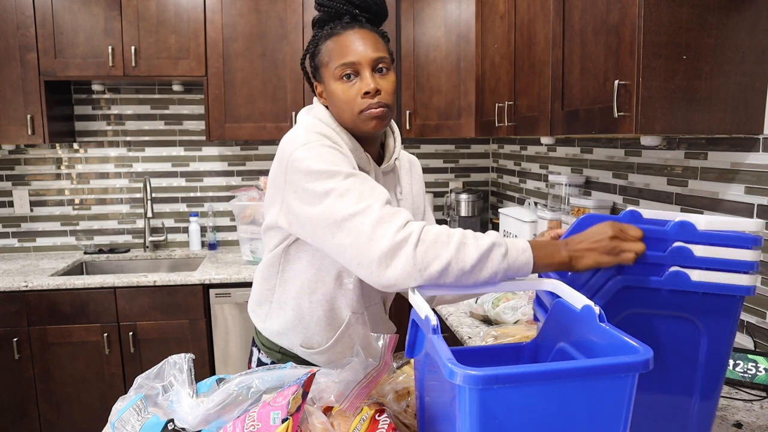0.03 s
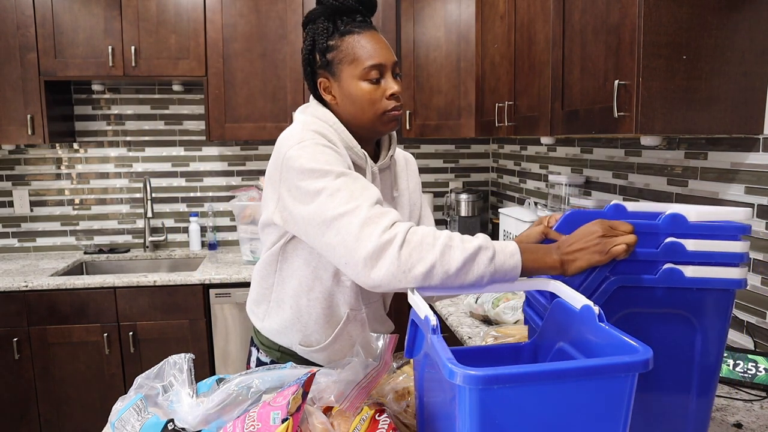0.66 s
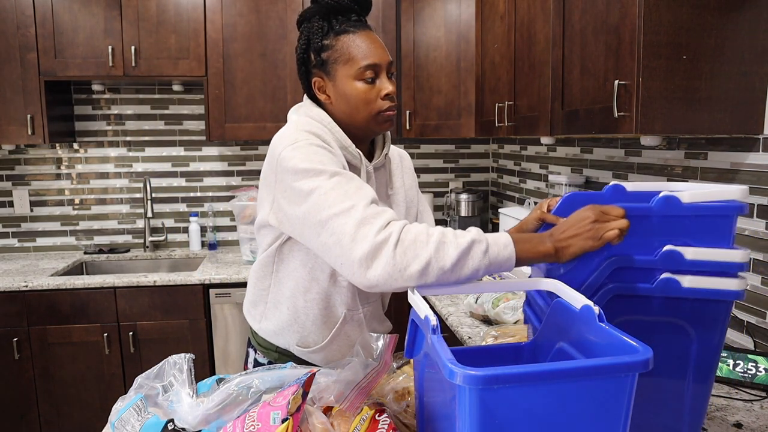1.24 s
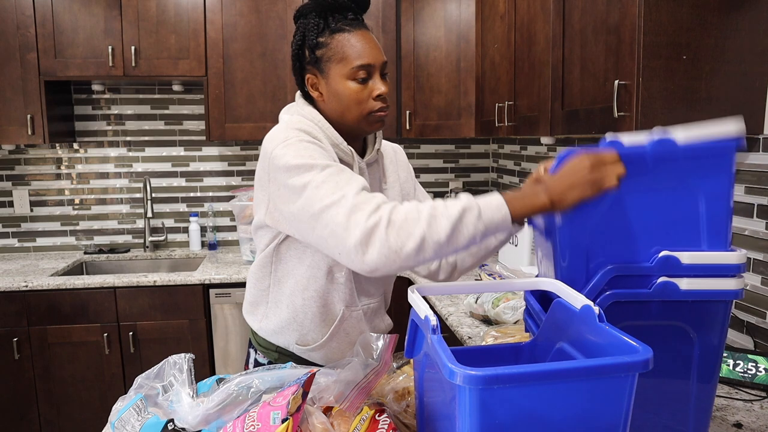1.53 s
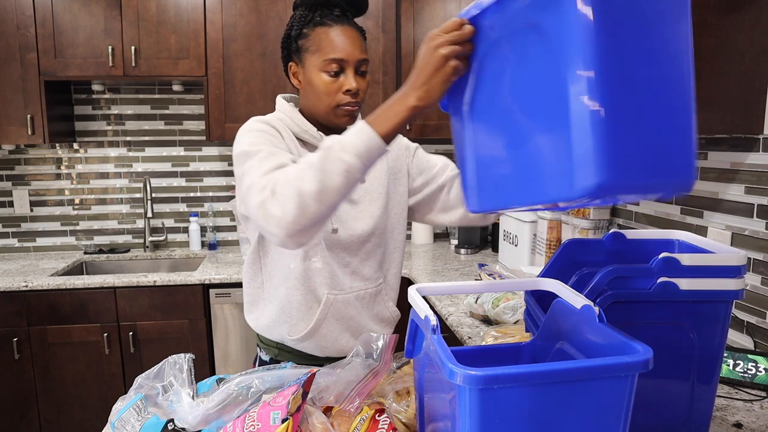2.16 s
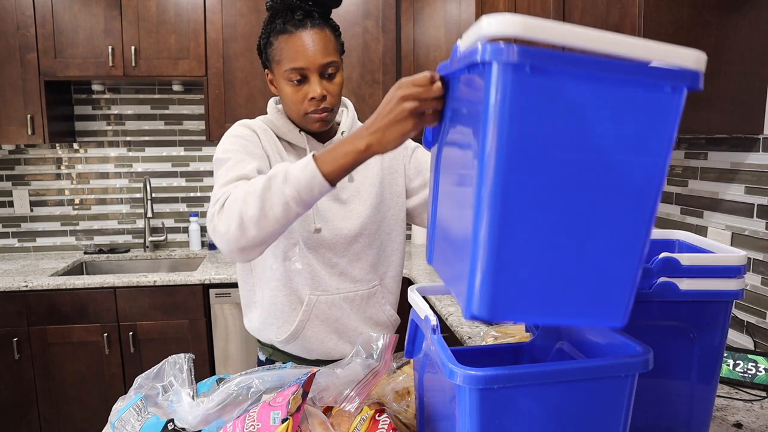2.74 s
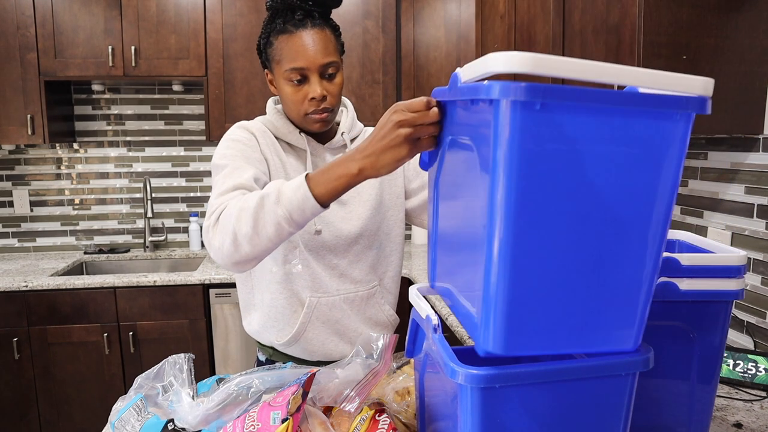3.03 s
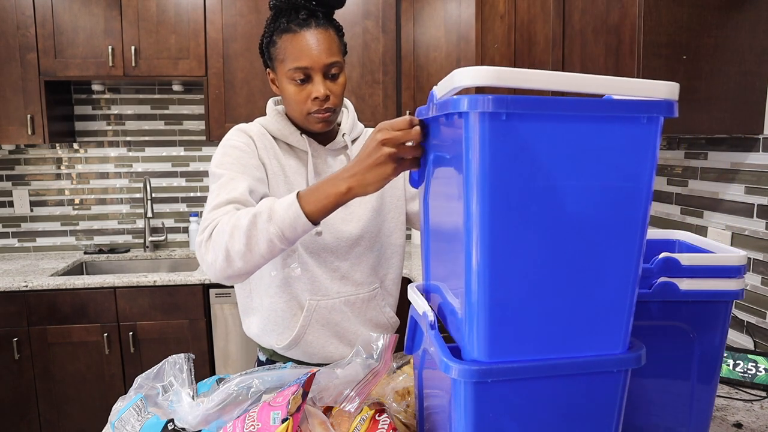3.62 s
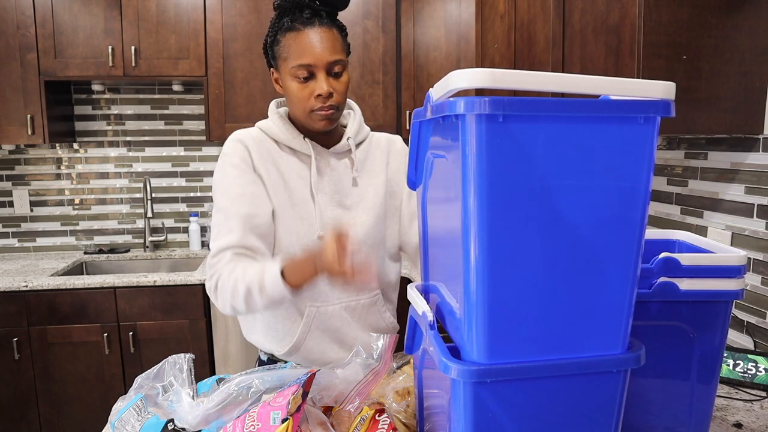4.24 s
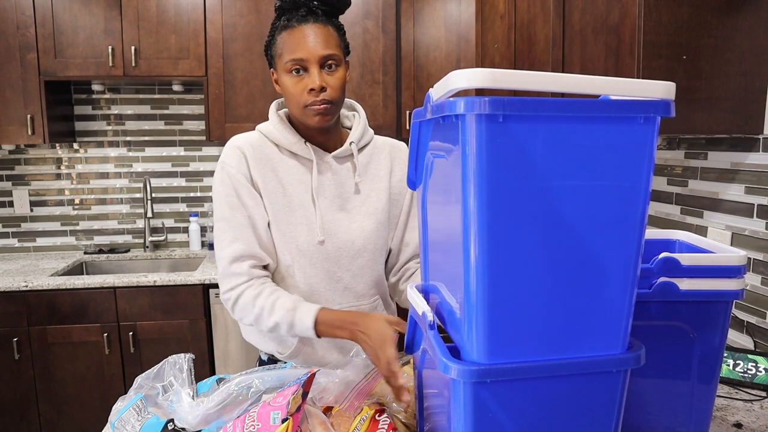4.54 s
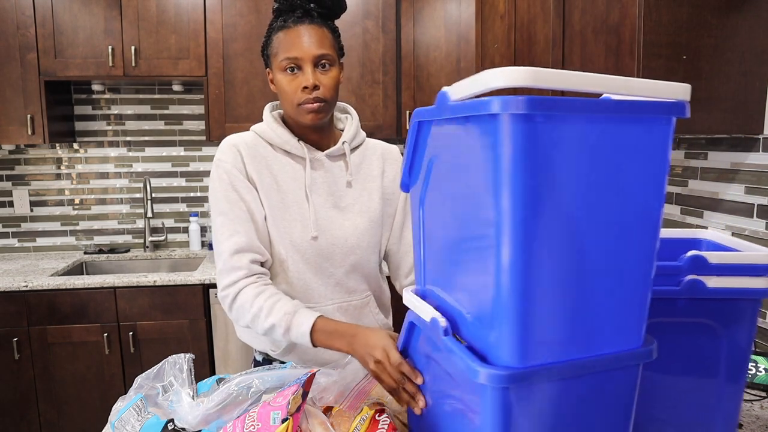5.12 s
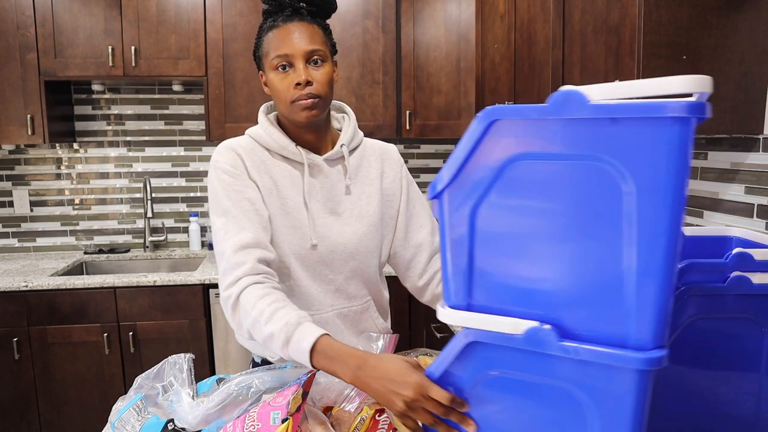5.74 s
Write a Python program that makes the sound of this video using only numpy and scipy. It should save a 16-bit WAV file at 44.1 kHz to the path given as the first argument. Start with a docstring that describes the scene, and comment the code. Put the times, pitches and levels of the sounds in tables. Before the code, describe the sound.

Hands rub and tap lightly on hollow plastic. A bin is tugged out of a nested pile with a loud, juddering clatter and a few more knocks. After a short pause it is set on another bin with a deep thump. Palms shift softly, then the stack scrapes over a gritty counter. The sounds are close, in a slightly echoing kitchen with a low appliance hum.

```python
"""Hands rub and tap on hollow plastic while an appliance hums underneath.
A bin is tugged out of a nested pile: its walls clatter, boom and judder as they stick and slip.
It is set on top of another bin, palms shift on it, and the stack scrapes over a kitchen counter.
Each knock is a sharp clack plus a deeper ring of the walls; each rub is many tiny slips over a hiss.
Cabinets and tiles throw the sounds back."""
import sys
import numpy as np
from scipy import signal
from scipy.fft import rfft, irfft
from scipy.io import wavfile

SR = 44100
rng = np.random.default_rng(int(sys.argv[2]) if len(sys.argv) > 2 else 0)


def digitize_waveform(pressure):
    """Quantize a signal to 16-bit integers and store it at the path in sys.argv[1].

    Rows of a 2-D input are taken as channels; values are limited to [-1, 1].
    """
    field = np.atleast_2d(pressure).T
    bounded = np.clip(field, -1, 1)
    quanta = np.round(bounded * 32767).astype(np.int16)
    wavfile.write(sys.argv[1], SR, quanta)


N = 259175
HZ = np.fft.rfftfreq(N, 1 / SR)
TIME = np.arange(N) / SR
GRIP_S, RELEASE_S = 0.00067, 0.063  # how fast a stroke takes hold and dies away

# Levels are relative, before mixing. A fade_s is the time a sound takes to fall by 60 dB.
# The steady tones of the appliance: pitch_hz, level_db
HUM_TONES = [(54.9, -48.5), (93.4, -44), (110, -55), (120, -58.5), (187, -79), (225, -56.5), (257, -56.5)]
# The tone colour (how strong the lows and highs are) of moving air: frequency_hz, level_db
AIR_COLOUR = [(15, -42), (30, -3.5), (45, -10.5), (72, -3), (100, -11.5), (135, -14), (240, -13),
              (420, -20), (1080, -28.5), (2550, -35), (5100, -44.5), (11200, -52), (12400, -67),
              (15000, -95)]
# Hands and walls rubbing on plastic: start_s, length_s, level_db, swell_db, treble_db
RUB_STROKES = [(0.0, 0.15, -46, -1, -10), (0.39, 0.052, -47.5, 4, -12.5), (0.745, 0.11, -52, 5, -8),
               (0.893, 0.019, -68.5, -24, 5), (1.03, 0.15, -55.5, -3, -17), (1.172, 0.14, -41.5, 13, -6.5),
               (3.42, 0.24, -55, -5.5, -14.5), (4.68, 0.046, -55, 1, -14), (4.85, 0.045, -58.5, -5, -7)]
# The tone colour of that rubbing: frequency_hz, level_db
RUBBING_COLOUR = [(40, -49), (150, 12.5), (300, 9.5), (580, 9.5), (1300, 6.5), (2200, 3.5), (4200, -3),
                  (5500, -7), (8000, -10.5), (10800, -10.5), (12200, -29), (15000, -49)]
# One knock a row. The clack is weaker above edge_hz; a firm grip leaves a small share of the ring time.
# start_s, clack_db, bright_db_per_octave, edge_hz, boom_db, boom_centre_hz, ring_share
KNOCK_EVENTS = [(0.098, -40, 10.5, 5700, -39, 1550, 0.41), (0.103, -40, 12, 5700, -44, 1300, 0.5),
                (0.428, -48.5, 10.5, 3800, -45.5, 1630, 0.71), (0.744, -46, 8.5, 12000, -55, 320, 0.89),
                (1.175, -50, 4, 12000, -60, 2030, 0.89), (1.263, -36.5, 4, 11000, -34, 247, 1),
                (1.319, -22, 2.5, 5400, -22.5, 517, 0.48), (1.337, -30, 11.5, 9000, -29, 114, 0.68),
                (1.342, -21, 0.5, 11000, -35, 564, .8), (1.351, -26, 3, 5000, -25, 168, 0.96),
                (1.400, -20.5, 4, 12000, -27, 198, 0.76), (1.404, -22.5, 8, 6500, -23.5, 470, 1),
                (1.414, -23, 3, 12000, -24.5, 116, 0.45), (1.420, -26, 5, 7060, -31.5, 66, 0.85),
                (1.427, -21, 5, 8000, -31.5, 540, 1), (1.433, -20.5, 1, 7000, -30, 1680, 0.79),
                (1.448, -31, -2, 2800, -24, 190, 0.7), (1.492, -35, 7.5, 2700, -37, 224, 0.92),
                (1.535, -38, 2.5, 2600, -47, 2000, 0.88), (1.617, -53, -7, 1500, -33.5, 105.4, 0.45),
                (1.736, -36.5, 8, 11000, -40.5, 720, 0.19), (1.742, -34, 0.5, 3000, -23, 265, 0.62),
                (1.769, -37, 5.5, 10000, -32, 292, 0.64), (1.786, -34, 1.5, 9000, -35, 950, 0.65),
                (1.814, -35, 0.5, 2600, -30, 263, 0.93), (1.833, -51, 9, 2600, -41.5, 650, 1),
                (1.922, -74, 2, 6000, -34, 293, 0.67), (2.946, -40.5, 2.5, 12000, -33.5, 336, 0.9),
                (2.950, -34, -5, 12000, -30.5, 730, 0.18), (2.963, -38.5, 2, 4000, -31, 382, 1),
                (3.009, -40.5, 4, 7460, -34.5, 326, 0.72), (3.089, -53, 3, 1900, -46, 1270, 0.37),
                (3.188, -32.5, 2.5, 9000, -27, 400, 0.74), (3.1885, -29.5, 0, 4500, -11.5, 209, 0.42),
                (3.203, -43, 1, 6000, -21.5, 192, 0.54), (3.237, -46, 4, 3000, -21.5, 189, 0.45),
                (3.322, -47, 1, 4000, -36.5, 255, 0.59), (4.562, -54.5, 4, 4000, -40.5, 620, 0.63),
                (4.803, -51, -6, 3000, -40, 337, 0.46), (4.909, -35.5, 5, 3700, -44, 3140, 0.27),
                (4.913, -33, -10, 3600, -43, 433, 0.43), (4.918, -38, 5, 12000, -27.5, 312, 0.47),
                (4.931, -50, 3, 3000, -30.5, 315, 0.54), (5.428, -44, 6, 9000, -52, 130, .7),
                (5.866, -39.5, 4, 11000, -37.5, 253, 1)]
# The tone colour of the crowd of tones in a clack: frequency_hz, level_db
CLACK_COLOUR = [(25, -50), (55, -24), (110, 9.5), (300, 11.5), (550, 5.5), (780, 5.5), (1050, 8.5),
                (1500, 2), (2100, -0.5), (3000, -7.5), (4200, -13.5), (6000, -21.5), (8000, -29.5),
                (10500, -29), (12500, -50), (14500, -88)]
# How long a clack lasts, from low to high: frequency_hz, fade_s
CLACK_FADE = [(300, 0.036), (1000, 0.074), (3000, 0.058), (10000, 0.094)]
# The tones that the bin's walls and rim ring with: pitch_hz, level_db, fade_s
WALL_TONES = [(65.6, 5.5, 0.23), (78, 6.5, 0.42), (111, -7.5, 0.31), (153, -12, 0.14), (168, -3.5, 0.24),
              (213.8, -6.5, 0.15), (238, 5, 0.16), (255, 0.5, 0.11), (287.6, 0, 0.22), (338, 1.5, 0.13),
              (363, -1, 0.1), (456, 1, 0.15), (484.7, 5, 0.18), (576.4, 5, 0.03), (606, 17, 0.07),
              (633.4, 15, 0.13), (687, 11, 0.19), (885, 14, 0.16), (980, 7, 0.11), (980, 8, 0.062),
              (1100, -2, 0.068), (1253, 11.5, 0.15), (1670, 4.5, 0.11), (1740, -16, 0.2), (2390, 9, 0.12),
              (3140, 3, 0.078), (3740, -5, 0.054), (4690, -3, 0.054)]
# Nested walls sticking and slipping as they part: start_s, length_s, level_db, centre_hz, width_octaves
JUDDER_EVENTS = [(1.324, 0.04, -20.5, 350, 0.72), (1.403, 0.05, -23.5, 180, 1.15),
                 (1.621, 0.035, -34, 225, 0.22), (1.741, 0.037, -26.5, 260, 0.17)]
# The tones that the wedged pile rings with: pitch_hz, level_db, fade_s
PILE_TONES = [(146.4, -4.5, 0.3), (208, -5.5, 0.2), (261, 1.5, 0.12), (479, -11, 0.19), (586, -0.5, 0.19),
              (693, -5.5, 0.14), (1050, 3, 0.25)]
# The bin brushing its way out of the pile: start_s, length_s, level_db, swell_db, treble_db
PULL_STROKES = [(1.49, 0.19, -37, -4.5, -26)]
# Palms shifting on the bin wall: start_s, length_s, level_db, swell_db
PALM_STROKES = [(3.664, 0.12, -43, -2), (4.568, 0.024, -39.5, -10), (4.645, 0.037, -45.5, 9)]
# The dull tone colour of skin on plastic: frequency_hz, level_db
SKIN_COLOUR = [(60, -13), (240, 4.5), (720, -14), (1150, -20), (9000, -51)]
# The stack catching and slipping along the counter: time_s, level_db, treble_db
SLIDE_CURVE = [(5.008, -45, -7), (5.04, -44.5, -6), (5.066, -46, -7), (5.096, -38, -10), (5.165, -42.5, -6),
               (5.21, -40.5, -5), (5.275, -43, -7.5), (5.312, -40.5, -5.5), (5.37, -44.5, -19),
               (5.412, -43, -4), (5.45, -48.5, -16), (5.53, -45.5, -11.5), (5.612, -43.5, -3.5),
               (5.634, -45, -21), (5.666, -44.5, -8), (5.716, -50.5, -10), (5.796, -47.5, -24),
               (5.85, -49.5, -5.5)]
# The tone colour of that scrape: frequency_hz, level_db
COUNTER_COLOUR = [(150, -18), (250, 1.5), (289, -8), (394, -6.5), (434, -9), (536, -7.5), (1030, -9.5),
                  (1370, -9), (2460, -8.5), (7060, -17), (8580, -20.5), (10400, -17), (12100, -29.5),
                  (15700, -70), (22000, -120)]
# How long the kitchen echoes: frequency_hz, fade_s
ROOM_FADE = [(150, 0.19), (500, 0.69), (2000, 0.44), (5000, 0.46), (11000, 0.24)]
# Stereo width of near sounds (more side signal sounds wider): frequency_hz, side_gain_db
NEAR_SIDE = [(100, -30), (250, -20), (550, -11), (1000, -4), (2700, 2), (6000, 7), (10000, 13.5),
             (13000, 18.5)]
# Stereo width of the far-off air: frequency_hz, side_gain_db
FAR_SIDE = [(80, -23.5), (170, -10), (260, -7.5), (500, 0), (1000, 3.5), (3000, 5.5), (11000, 5.5)]


def amp(db):
    """Turns decibels into a number to multiply by."""
    return 10 ** (np.asarray(db) / 20)


def evened(x, first=None):
    """Scales a sound so its average strength (rms) is 1, overall or over its first samples."""
    return x / np.sqrt(np.mean(x[:first] ** 2) + 1e-20)


def look_up(table, hz):
    """Reads between the rows of a table, with frequency spaced in octaves."""
    row_hz, value = np.transpose(table)
    return np.interp(np.log(hz + 1), np.log(row_hz + 1), value)


def coloured(x, colour):
    """Turns each frequency up or down as a table says."""
    hz = np.fft.rfftfreq(len(x), 1 / SR)
    return irfft(rfft(x) * amp(look_up(colour, hz)), len(x))


def faded(x, fade_table):
    """Lets each frequency die away at its own speed."""
    hz, t, bands = signal.stft(x, SR, nperseg=128)
    fade = amp(-60 * t / look_up(fade_table, hz)[:, None])
    return signal.istft(bands * fade, SR, nperseg=128)[1][:len(x)]


def add(mix, start_s, sound):
    """Mixes a sound in at the given time."""
    part = mix[max(round(start_s * SR), 0):][:len(sound)]
    part += sound[:len(part)]


def drift(rate_hz):
    """A smooth random wobble; a higher rate makes it quicker."""
    return evened(irfft(rfft(rng.standard_normal(N)) * np.exp(-(HZ / rate_hz) ** 2), N))


def appliance(waver_db=0.56, wander_radians=0.045, air_db=-43):
    """Motor tones waver in moving air. Gives mid (shared by both ears) and side (left versus right)."""
    hum = np.zeros(N)
    for hz, db in HUM_TONES:
        gain = np.sqrt(2) * amp(db + waver_db * drift(4.1))
        hum += gain * np.sin(2 * np.pi * (hz * TIME + rng.random()) + wander_radians * drift(1))
    mid, side = (amp(air_db) * evened(coloured(rng.standard_normal(N), AIR_COLOUR)) for _ in range(2))
    return np.array([mid + hum, coloured(side, FAR_SIDE)])


def stroke(start_s, length_s, level_db, swell_db):
    """The loudness of one stroke: it takes hold, swells or eases with the pressure, and lets go."""
    t = np.maximum(TIME - start_s, 0)
    pressure = amp(level_db + swell_db * (np.minimum(t / length_s, 1) - .5))
    return pressure * np.minimum(t / GRIP_S, 1) * np.exp(-np.maximum(t - length_s, 0) / RELEASE_S)


def strokes(rows):
    """The loudness of a series of strokes: one curve for the body of the sound, one for its treble."""
    body, treble = np.zeros((2, N))
    for *shape, treble_db in rows:
        gain = stroke(*shape)
        body += gain
        treble += gain * amp(treble_db)
    return body, treble


def friction(gains, colour, slips_per_s, grain_db, hiss, jerk_db, treble_db, split_hz=5500):
    """Surfaces rub in tiny slips of uneven size over a fine hiss, swelling with the stroke."""
    body_gain, treble_gain = gains
    slips = (rng.random(N) < slips_per_s / SR) * rng.choice([-1, 1], N)
    sizes = amp(grain_db * np.minimum(rng.exponential(1, N), 4))
    scrape = coloured(evened(slips * sizes) + hiss * rng.standard_normal(N), colour)
    treble = irfft(rfft(scrape) / (1 + (split_hz / (HZ + 1)) ** 8), N)
    sound = body_gain * evened(scrape - treble) + amp(treble_db) * treble_gain * evened(treble)
    return amp(jerk_db * drift(41)) * sound


def rubbing():
    """Hands and walls rub on plastic in short, jerky strokes."""
    return friction(strokes(RUB_STROKES), RUBBING_COLOUR, slips_per_s=1100,
                    grain_db=2.0, hiss=0.87, jerk_db=2.5, treble_db=-4.0)


def clack(t, bright_db_per_octave, edge_hz, crack_s=0.00041, contact_s=0.00069):
    """A crack, then a crowd of quickly dying plastic tones; a harder hit is more sudden and brighter."""
    onset = 1 - np.exp(-t / (contact_s * amp(-2 * bright_db_per_octave)))
    crack = 1 + 2.2 * np.exp(-t / crack_s)
    ring = faded(rng.standard_normal(len(t)), CLACK_FADE) * crack * onset
    hz = np.geomspace(20, SR / 2, 200)
    tilt_db = bright_db_per_octave * np.log2(np.maximum(hz / 1500, .5))
    soft_db = -14 / (1 + (edge_hz / hz) ** 10)  # the contact is too soft to stir the highest tones much
    colour = np.column_stack([hz, look_up(CLACK_COLOUR, hz) + tilt_db + soft_db])
    return evened(coloured(ring, colour), first=SR // 50)


def boom(centre_hz, ring_share, width_octaves=0.35, rise_s=0.0043, detune=0.003):
    """Walls and rim flex and ring; the spot that is struck picks which tones are strongest."""
    t = np.arange(2 ** 14) / SR
    hz, db, fade_s = np.transpose(WALL_TONES)[:, :, None]
    share = (1 + (np.log2(hz / centre_hz) / width_octaves) ** 2) ** -1.6
    bend, phase = rng.standard_normal((2, len(WALL_TONES), 1))
    hz = hz * (1 + detune * bend)  # the grip bends the walls and shifts each tone a little
    gain = share * amp(db - 60 * t / (ring_share * fade_s))
    tones = gain * np.sin(2 * np.pi * hz * t + 0.95 * phase)
    return evened(tones.sum(0) * (1 - np.exp(-t / rise_s)), first=SR // 50)


def knocks(flex_delay_s=0.002045):
    """Each knock clacks; just after, the whole bin booms."""
    t = np.arange(2 ** 13) / SR
    # The clacks take turns on three tracks; each track later gets its own set of kitchen echoes.
    clacks, booms = np.zeros((3, N)), np.zeros(N)
    for k, (start_s, clack_db, bright, edge_hz, boom_db, centre_hz, share) in enumerate(KNOCK_EVENTS):
        add(clacks[k % 3], start_s, amp(clack_db) * clack(t, bright, edge_hz))
        add(booms, start_s + flex_delay_s, amp(boom_db) * boom(centre_hz, share))
    return clacks, booms


def judder(wander=0.023, chatter_db=2.0, chatter_hz=70, rise_s=0.0029):
    """Sticking and slipping keep the pile ringing; its tones waver as the walls bend, then die away."""
    t, out = np.arange(SR // 2) / SR, np.zeros(N)
    hz, db, fade_s = np.transpose(PILE_TONES)[:, :, None]
    bend = drift(24)
    for start_s, length_s, level_db, centre_hz, width_octaves in JUDDER_EVENTS:
        share = 1 / (1 + (np.log2(hz / centre_hz) / width_octaves) ** 2)
        pitch_ratio = 1 + wander * bend[round(start_s * SR):][:len(t)]
        cycles = hz * np.cumsum(pitch_ratio) / SR + rng.random((len(PILE_TONES), 1))
        gain = share * amp(level_db + db - 60 * np.maximum(t - length_s, 0) / fade_s)
        tones = np.sqrt(2) * gain * np.sin(2 * np.pi * cycles)
        add(out, start_s, tones.sum(0) * (1 - np.exp(-t / rise_s)))
    return out * amp(chatter_db * drift(chatter_hz))


def pulling():
    """The lifted bin brushes against the pile on its way out."""
    return friction(strokes(PULL_STROKES), CLACK_COLOUR, slips_per_s=480,
                    grain_db=3.5, hiss=0.58, jerk_db=1.0, treble_db=-3.5)


def through_walls(scrape):
    """A scrape sets the freed bin ringing, so both are heard together."""
    walls = boom(centre_hz=1700, ring_share=1.9, width_octaves=1.0)
    ringing = signal.oaconvolve(scrape, walls)[:N]
    return amp(11.5) * scrape + amp(1) * np.std(scrape) * evened(ringing)


def palms(jerk_db=2.5):
    """Soft palms rub the hollow wall: dull, uneven and without a crack."""
    skin = evened(coloured(rng.standard_normal(N), SKIN_COLOUR))
    return sum(stroke(*row) for row in PALM_STROKES) * amp(jerk_db * drift(30)) * skin


def sliding():
    """One long, uneven push scrapes the stack over the gritty counter."""
    time_s, level_db, treble_db = np.transpose(SLIDE_CURVE)
    push = amp(np.interp(TIME, time_s, level_db)) * np.clip((TIME - time_s[0]) / GRIP_S, 0, 1)
    treble_gain = push * amp(np.interp(TIME, time_s, treble_db))
    scrape = friction((push, treble_gain), COUNTER_COLOUR, slips_per_s=1300,
                      grain_db=2.5, hiss=0.8, jerk_db=1.4, treble_db=-0.4)
    return scrape + amp(-7) * treble_gain * grit()


def grit(ticks_per_s=90, size_db=4.0, low_hz=3000, high_hz=10500, ring_s=0.00032, pitches=16):
    """Specks of grit catch under the sliding bin: scattered ticks at different high pitches."""
    t, out = np.arange(256) / SR, np.zeros(N)
    ticks = (rng.random(N) < ticks_per_s / SR) * amp(size_db * np.minimum(rng.exponential(1, N), 2))
    chosen_pitch = rng.integers(0, pitches, N)
    for k, hz in enumerate(np.geomspace(low_hz, high_hz, pitches)):
        ping = t / ring_s * np.exp(-t / ring_s) * np.sin(2 * np.pi * hz * t)
        out += signal.oaconvolve(ticks * (chosen_pitch == k), ping)[:N]
    return evened(out)


def travelling(x, tracks_per_s=7):
    """Passes a sound around the three tracks, so its echoes keep changing as the bin moves."""
    place = (tracks_per_s * TIME + np.arange(3)[:, None]) % 3
    return x * np.sin(np.pi / 2 * np.minimum(place, 2))


def echoes(x, early_db, tail_db, early_s=0.0016, build_s=0.0041):
    """A sound bounces off counter and cabinets, then lingers in the kitchen."""
    t = np.arange(SR // 2) / SR
    bounces = rng.choice([-1., 1.], (2, len(t))) * (rng.random((2, len(t))) < 1 / 8)
    early = bounces[0] * np.exp(-t / early_s) * (t > .001)
    tail = faded(bounces[1], ROOM_FADE) * (1 - np.exp(-t / build_s))
    room = amp(early_db) * early / np.linalg.norm(early) + amp(tail_db) * tail / np.linalg.norm(tail)
    return signal.oaconvolve(x, room)[:N]


def kitchen(x, early_db, tail_db, lean, spread, lean_radians=0.96, lean_hz=8500):
    """Places a near sound a little to the right, with its echoes. Gives mid and side."""
    mid = x + echoes(x, early_db, tail_db)
    direct_side = irfft(rfft(x) * -lean * np.exp(1j * lean_radians - (HZ / lean_hz) ** 2), N)
    side = direct_side + spread * echoes(x, early_db, tail_db)
    return np.array([mid, coloured(side, NEAR_SIDE)])


def scene():
    """Mixes the rubs, knocks and slide in the kitchen, over the hum, into left and right."""
    clacks, booms = knocks()
    rubs, pull, slide = rubbing(), pulling(), sliding()
    scrapes = amp(-0.5) * rubs + amp(-15.0) * through_walls(pull) + amp(-2.0) * slide
    tracks = clacks + travelling(scrapes)
    plastic = sum(kitchen(track, early_db=-9.5, tail_db=-4.5, lean=1.0, spread=1.13) for track in tracks)
    hollow = kitchen(booms + judder() + palms(), early_db=-33.0, tail_db=-10.0, lean=0.67, spread=0.93)
    mid, side = plastic + hollow + appliance()
    return np.array([mid + side, mid - side])


def record(dry, low_cut_hz=43, high_cut_hz=14500):
    """The microphone drops the low rumble; then the biggest peaks and the highest treble are cut."""
    no_rumble = signal.sosfilt(signal.butter(4, low_cut_hz, "high", fs=SR, output="sos"), dry)
    treble_cut = signal.firwin(255, high_cut_hz, window=("kaiser", 9), fs=SR)
    return signal.oaconvolve(np.clip(no_rumble, -.95, .95), treble_cut[None], "same")


dry = scene()
out = record(dry)
digitize_waveform(out)
```